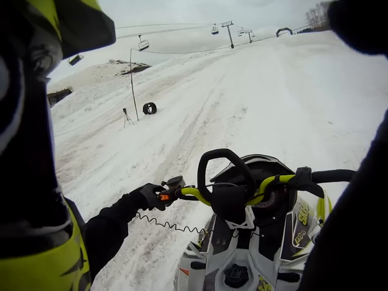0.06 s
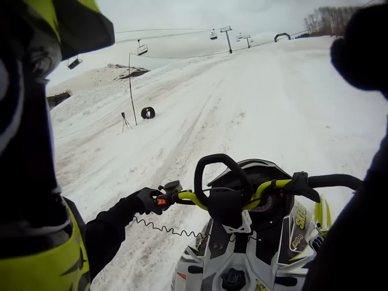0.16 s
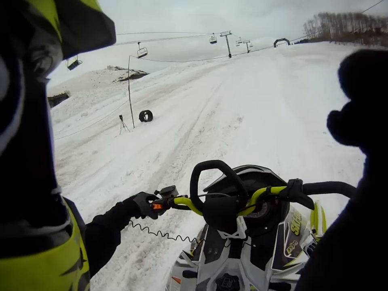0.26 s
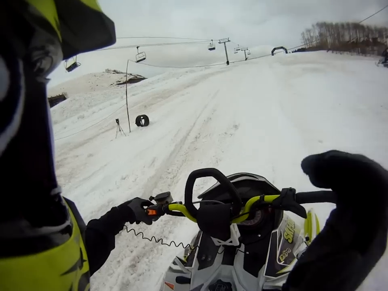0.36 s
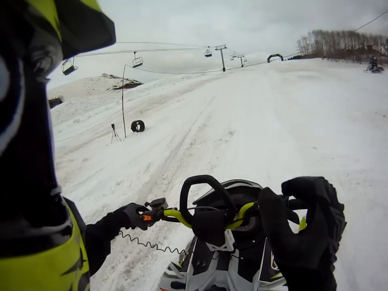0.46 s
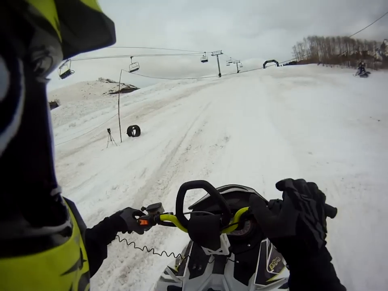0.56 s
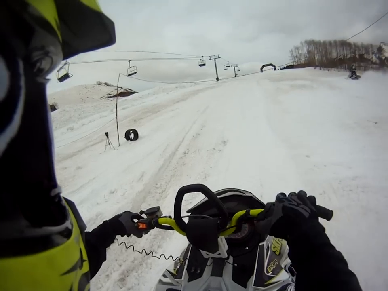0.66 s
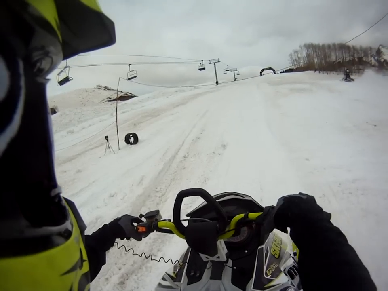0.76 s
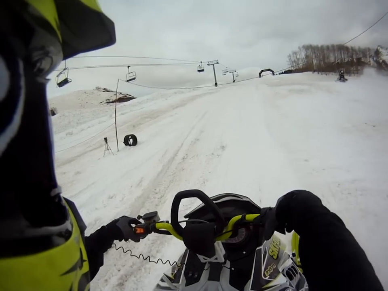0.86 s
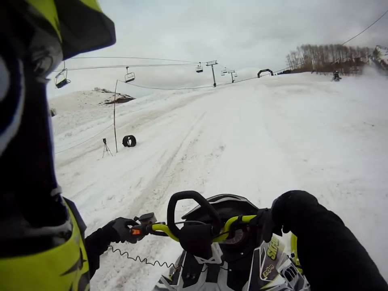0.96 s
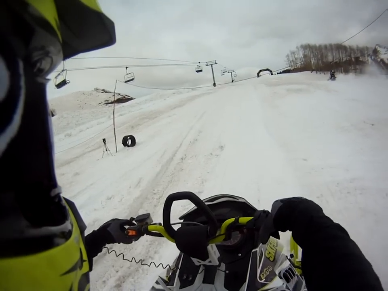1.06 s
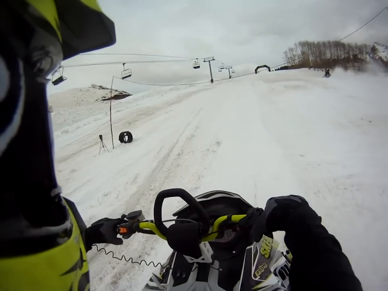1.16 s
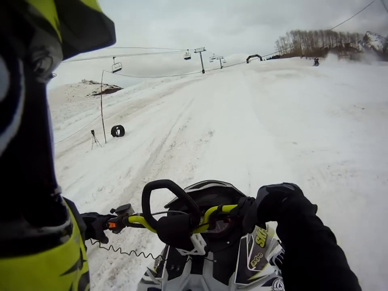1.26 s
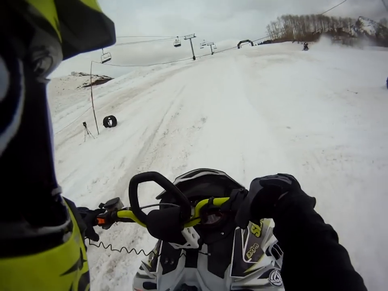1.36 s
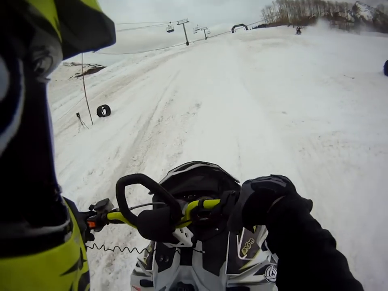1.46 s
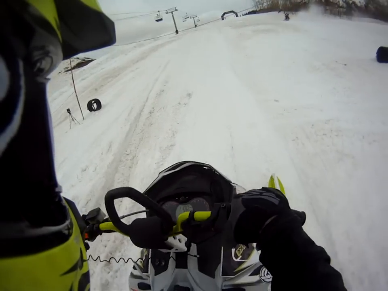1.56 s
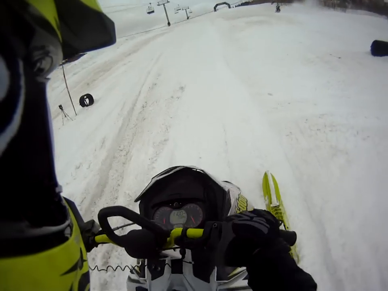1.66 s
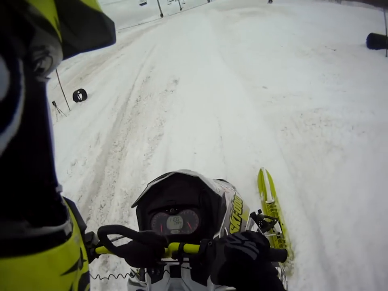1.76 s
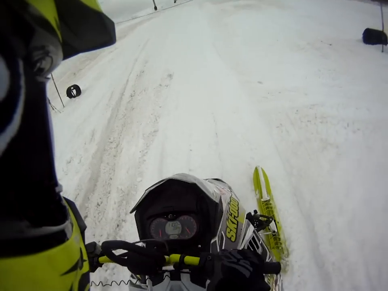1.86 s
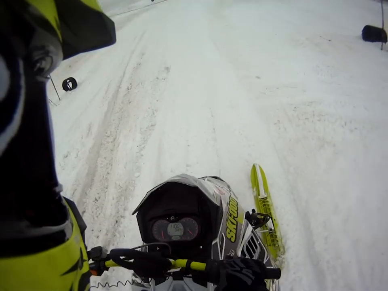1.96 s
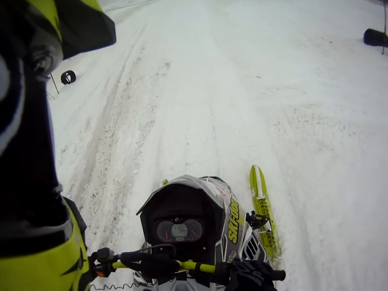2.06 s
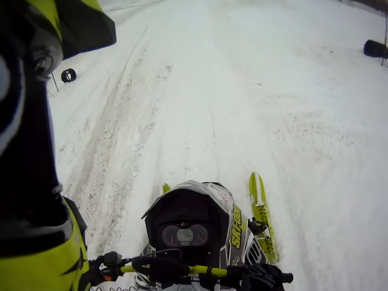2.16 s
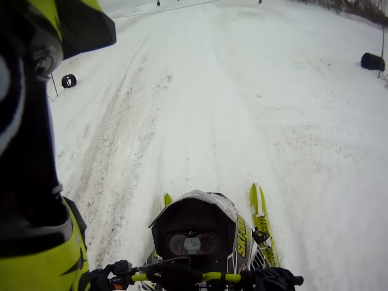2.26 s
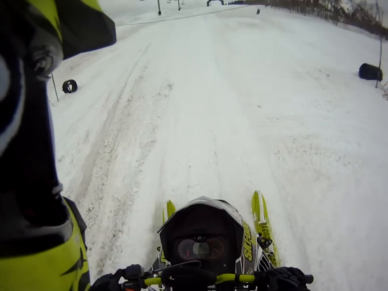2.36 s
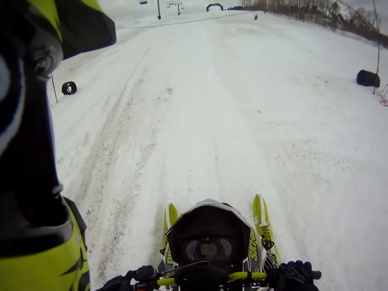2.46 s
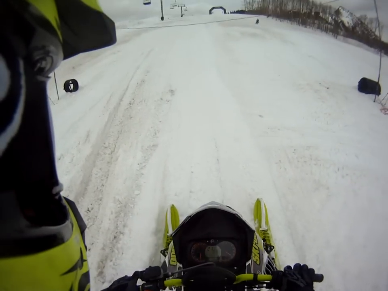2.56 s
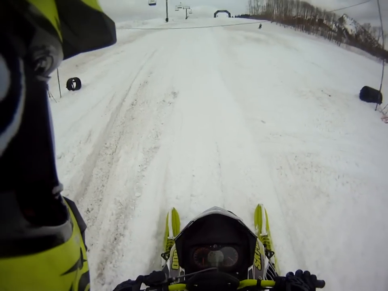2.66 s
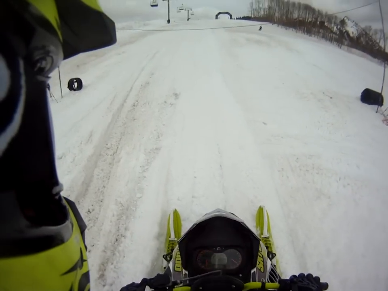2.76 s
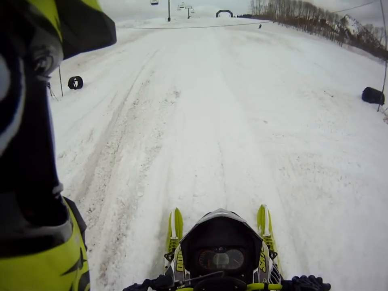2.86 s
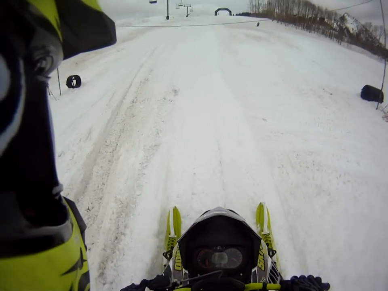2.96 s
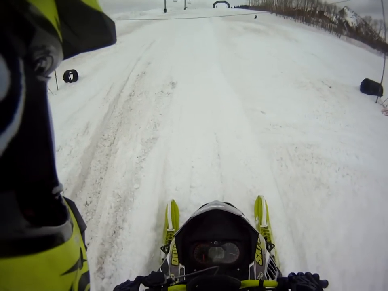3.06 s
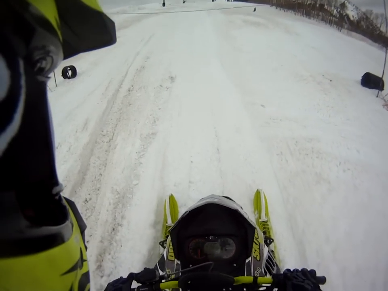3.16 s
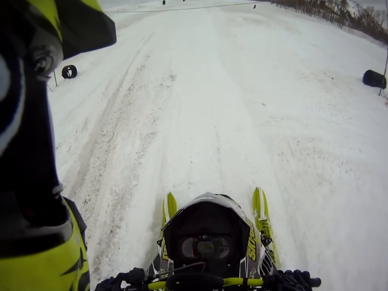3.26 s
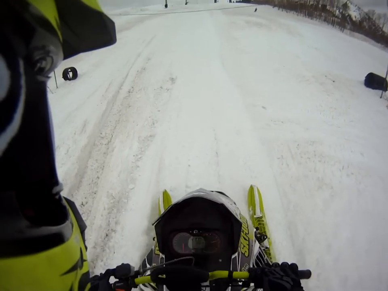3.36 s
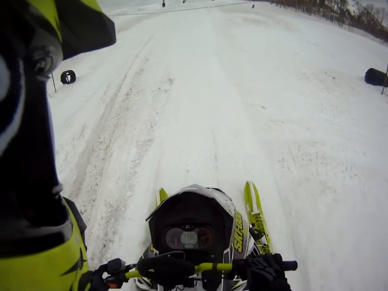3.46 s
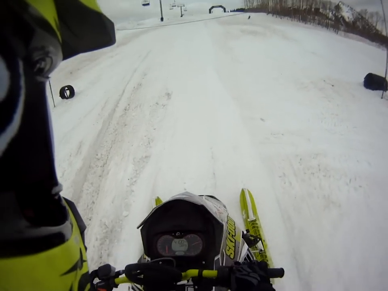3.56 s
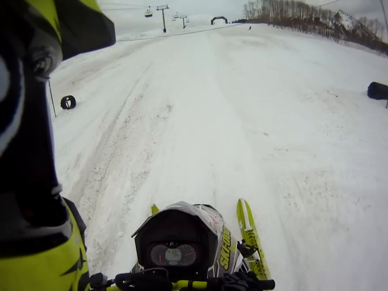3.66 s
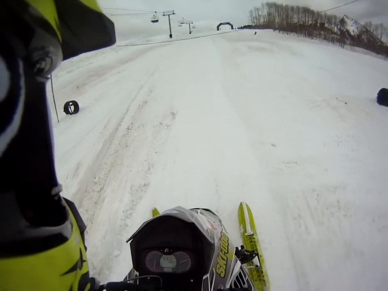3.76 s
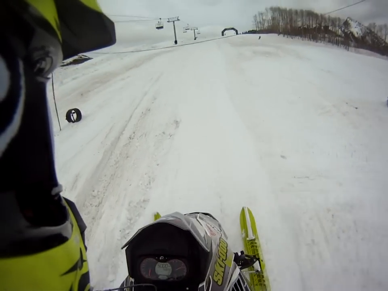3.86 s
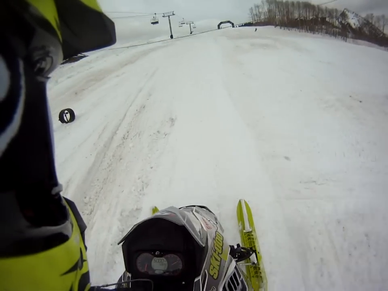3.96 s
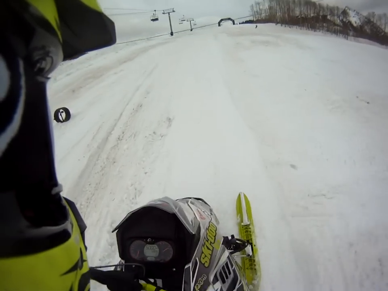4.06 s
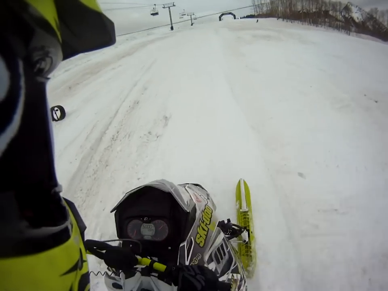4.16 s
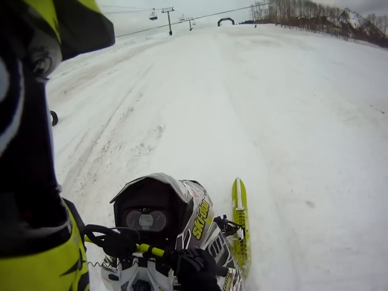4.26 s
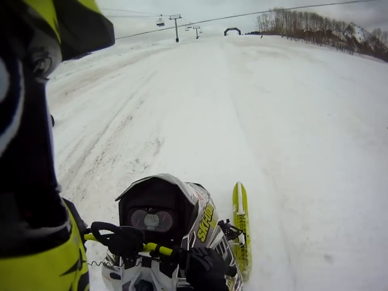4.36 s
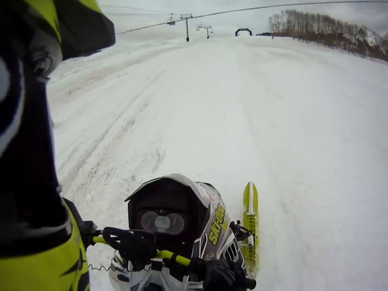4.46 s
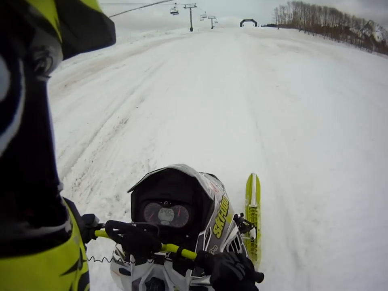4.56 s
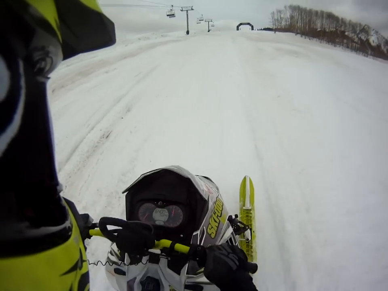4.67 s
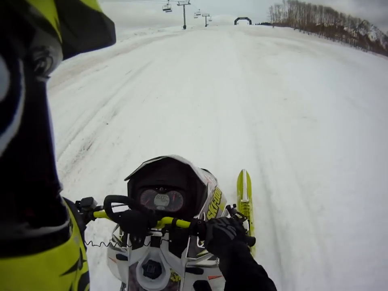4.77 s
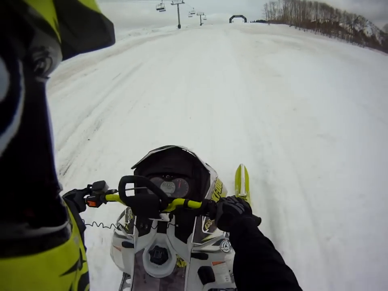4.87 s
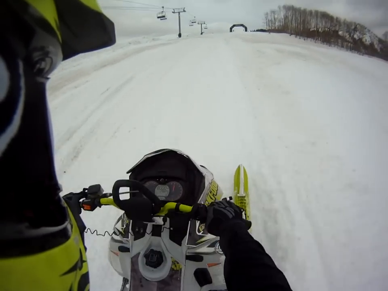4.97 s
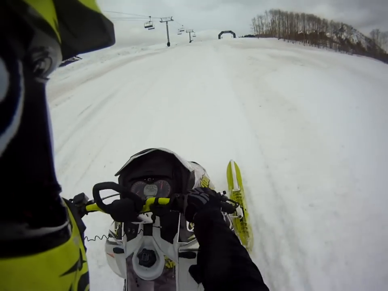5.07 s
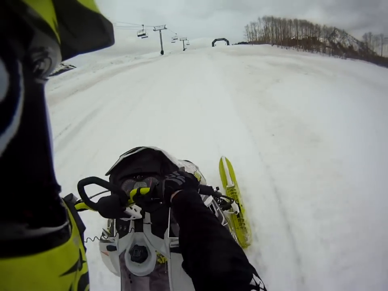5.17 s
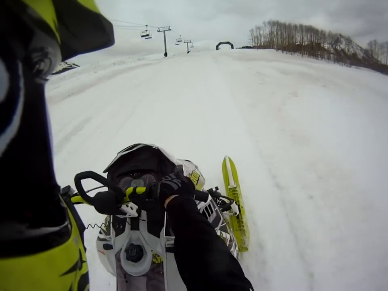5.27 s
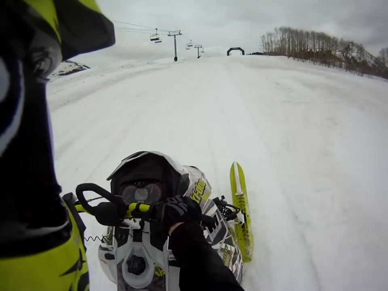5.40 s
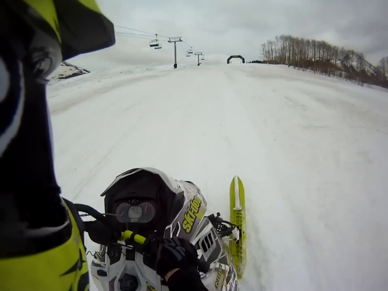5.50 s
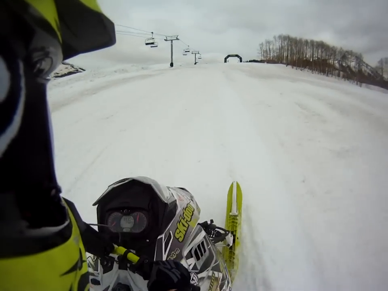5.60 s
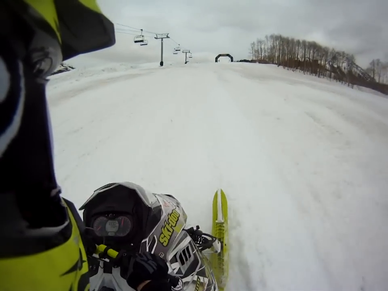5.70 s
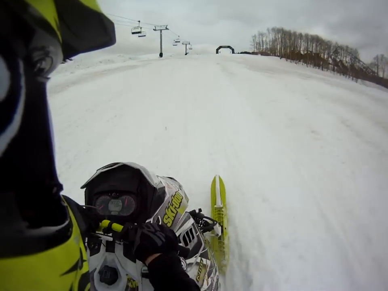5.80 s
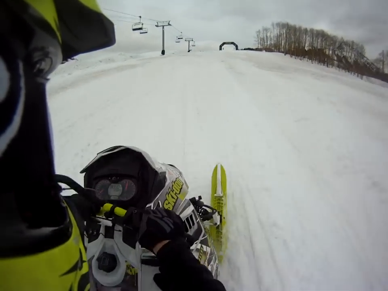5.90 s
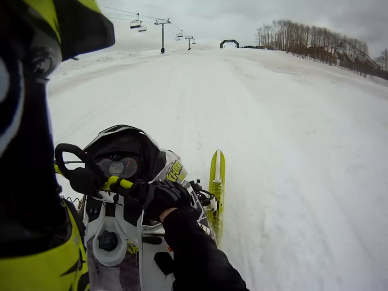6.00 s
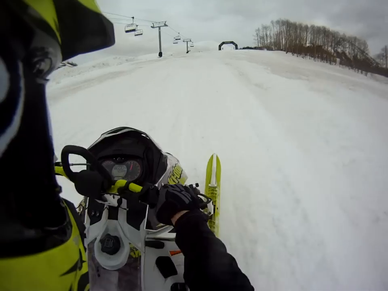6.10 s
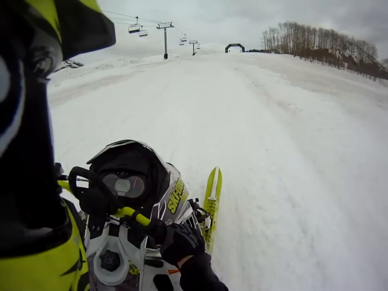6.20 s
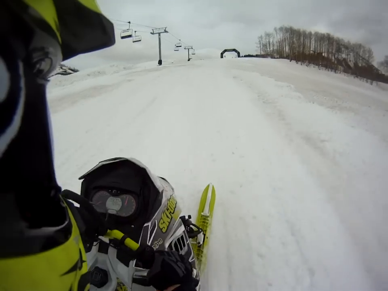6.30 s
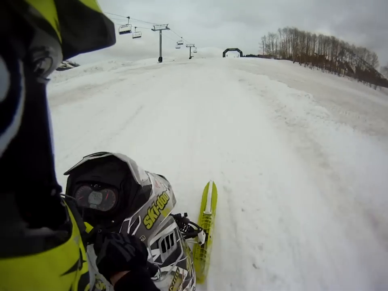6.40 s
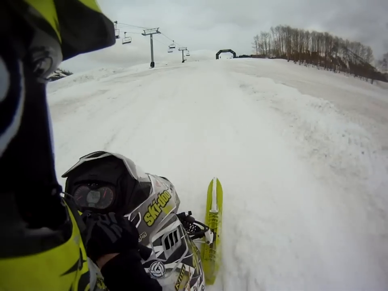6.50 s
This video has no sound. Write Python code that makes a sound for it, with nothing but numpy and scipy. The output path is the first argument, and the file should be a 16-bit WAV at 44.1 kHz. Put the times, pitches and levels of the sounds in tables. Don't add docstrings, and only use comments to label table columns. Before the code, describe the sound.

Outdoors on snow, heard through a sealed camera case on the rider: hard glove knocks and scrapes first, over a quiet lumpy two-stroke idle. A sharp blip and small dabs follow, then a closer engine is pumped several times, each louder, and held at a buzzing, whining full-throttle howl while wind puffs and track hum join. The sound is muffled yet gritty, with metallic low-rate digital edges.

```python
import sys
import numpy as np
from scipy import signal
from scipy.io import wavfile
from scipy.ndimage import uniform_filter1d

SR = 44100
rng = np.random.default_rng(int(sys.argv[2]) if len(sys.argv) > 2 else 0)


def attenuation_scalar(level_db):
    decades = np.asarray(level_db, float) / 20
    return 10 ** decades


def log_audio(samples):
    frames = np.atleast_2d(samples).T
    limited = np.clip(frames, -1, 1)
    pcm = np.round(limited * 32767).astype(np.int16)
    wavfile.write(sys.argv[1], SR, pcm)


N = 288414
T = np.arange(N) / SR


def read(table, fade=0.022):
    s, *columns = np.transpose(table)
    gate = np.clip(np.minimum(T - s[0], s[-1] - T) / fade + 1, 0, 1)
    return [gate] + [np.interp(T, s, column) for column in columns]


def noise():
    return rng.standard_normal(N)


def smooth_twice(x, size):
    return uniform_filter1d(uniform_filter1d(x, size), size)


def even(x, span=0.06):
    return x / np.sqrt(smooth_twice(x ** 2, int(span * SR)) + 1e-18)


def ring(x, hz, width):
    return signal.lfilter(*signal.iirpeak(hz, hz / width, fs=SR), x)


def body(x, modes):
    return sum((-1) ** k * attenuation_scalar(db) * ring(x, hz, width) for k, (hz, width, db) in enumerate(modes))


def walk(rate):
    hold = int(SR / rate)
    steps = np.repeat(rng.standard_normal(N // hold + 1), hold)
    return 2.19 * smooth_twice(steps, hold)[:N]


def colour(points, hz):
    point_hz, point_db = np.transpose(points)
    return np.interp(np.log(hz), np.log(point_hz), point_db)


def orders(turns, first, levels_db, wobble, lag):
    out = 0
    for k, db in enumerate(levels_db):
        level = np.sqrt(2) * attenuation_scalar(db + .8 * walk(20))
        out = out + level * np.cos((first + k) * (2 * np.pi * turns - lag) + wobble * walk(12))
    return out


def hum(table, wobble, overtone_db):
    gate, hz, db = read(table)
    levels_db = [db + overtone_db, db, db - 40, db + overtone_db]
    return gate * orders(np.cumsum(hz) / SR / 2, 0.95, levels_db, wobble=wobble, lag=0)


def throttle(rows, first, cut_db, climb_db_per_hz, slew_s):
    opens, shuts, low_hz, top_hz, db = np.transpose(rows)
    turning_s = np.r_[first[0], np.c_[opens, shuts].ravel()]
    turning_hz = np.r_[first[1], np.c_[low_hz, top_hz].ravel()]
    hz = uniform_filter1d(np.interp(T, turning_s, turning_hz), size=900)
    row = np.minimum(np.searchsorted(shuts, T), len(rows) - 1)
    slew = int(slew_s * SR)
    on = uniform_filter1d(1. * (T >= opens[row]), slew)
    trim = uniform_filter1d((db - climb_db_per_hz * top_hz)[row], slew)
    return hz, on, trim + climb_db_per_hz * hz - cut_db * (1 - on)


def pull(hz, full_rise):
    rise = uniform_filter1d(np.gradient(hz), size=1200) * SR / full_rise
    return np.clip(np.maximum(rise, np.roll(rise, shift=1100)), 0, 1)


def firings(turns, scatter_db, late_s, uneven_db):
    at = np.flatnonzero(np.diff(np.floor(turns)) > 0)
    strength, lateness = rng.standard_normal((N // 100, 2))[:len(at)].T
    size = attenuation_scalar(scatter_db * strength - uneven_db * (np.arange(len(at)) % 2))
    pulses = np.zeros(N)
    np.add.at(pulses, np.clip(at + (late_s * SR * lateness).astype(int), 0, N - 1), size)
    return pulses


def rasp(turns, pulses, modes, puff, gas_db, low_db):
    gas = np.exp(-(turns % 1) / puff) * noise() * attenuation_scalar(2 * walk(25))
    drive = even(pulses) + attenuation_scalar(gas_db) * even(gas)
    return attenuation_scalar(low_db) * even(body(drive, modes[:3])) + even(body(drive, modes[3:]))


# (time [s], peak level [dB], half length [s])
GUSTS = [
    (1.47, -51, .1),
    (2.02, -35.5, 0.048),
    (2.47, -52, 0.22),
    (2.803, -44, 0.15),
    (3.412, -48, 0.07),
    (4.27, -37, 0.055),
    (5.084, -35, 0.061),
    (5.586, -40, 0.061),
    (5.98, -35, 0.055),
    (6.459, -31, 0.096),
]


def wind():
    still_db, moving_db, moves_s = -48.5, -34.5, 3.42
    steady = attenuation_scalar(np.interp(T, [moves_s - .1, moves_s], [still_db, moving_db]))
    puffs = sum(attenuation_scalar(db) * np.exp(-((T - s) / half) ** 2) for s, db, half in GUSTS)
    gust = (steady + puffs) * attenuation_scalar(0.65 * walk(9))
    rumble = even(ring(ring(noise(), 25.0, 52), 35, 105), span=0.22)
    buffet = even(ring(noise(), 240, 280), span=.3)
    return gust * attenuation_scalar(-9.5) * (rumble + buffet)


# (time [s], frequency [Hz], level [dB])
SHAKE = [
    (0.5, 37.5, -49),
    (1.52, 37.1, -65),
    (1.74, 39.7, -56),
    (2.65, 39.7, -50),
    (3.16, 39, -59),
    (3.28, 39.2, -41),
    (3.5, 38.4, -57),
]


def seat_shake():
    return hum(SHAKE, wobble=0.56, overtone_db=-21)


# (time [s], frequency [Hz], level [dB])
TRACK = [
    (4.45, 144, -49.5),
    (4.8, 182.3, -43.5),
    (5.35, 199.7, -51),
    (5.8, 230.5, -40.5),
    (6.54, 250.1, -47),
]


def track():
    return hum(TRACK, wobble=0.39, overtone_db=-4)


# (frequency [Hz], width [Hz], level [dB])
CASE_MODES = [(547, 61, -6.5), (825, 40, -3.5), (1181, 44.5, 7), (1505, 115, -0.5), (1882, 161, 4.5),
              (2162, 90, 4.5), (3542, 440, -8.5), (4290, 830, -17), (5450, 220, -9.5)]
# (time [s], rustle level [dB], low shove level [dB])
GLOVE = [
    (0.0, -47, -59),
    (0.096, -44, -43.5),
    (0.188, -37, -27.5),
    (0.212, -40, -7.5),
    (0.232, -69, -48),
    (0.288, -43, -33),
    (0.328, -57, -46),
    (0.345, -38, -43),
    (0.9, -45.5, -79),
]
# (time [s], centre [Hz], level [dB])
SLEEVE = [
    (0, 2310, -37),
    (.17, 2220, -33),
    (.2, 2270, -72),
    (.35, 3500, -52),
    (.87, 3500, -56),
    (1.0, 4015, -49),
    (1.15, 4170, -66),
    (1.3, 4480, -53),
    (1.6, 4540, -60.5),
]
# (time [s], length [s], level [dB], thump level [dB], thump frequency [Hz])
BUMPS = [
    (0.194, 0.0042, -16, -5, 120),
    (0.201, 0.0023, -18, -7, 110),
    (0.2098, 0.0052, -4, -7.5, 310),
    (0.239, 0.0083, -43, -14, 100),
    (2.112, 0.0087, -32, -23, 196.6),
    (2.123, 0.0069, -35.5, -23, 407),
    (2.204, 0.0044, -39, -30, 505),
    (2.673, 0.0051, -39, -30, 301.7),
]
# (time [s], length [s], level [dB])
SCRAPES = [
    (0.252, 0.053, -30),
    (0.276, .019, -23.5),
    (0.311, 0.024, -30),
]


def glove():
    gate, rustle_db, shove_db = read(GLOVE, fade=0.8)
    grain = noise() * attenuation_scalar(0.39 * walk(210))
    dull = even(body(grain, CASE_MODES[1:6]))
    bright = even(ring(grain, 3460, 670) + 0.12 * ring(grain, 4570, 290))
    latch = even(ring(grain, 5000, 300))
    rustle = attenuation_scalar(rustle_db - 8.0) * (dull + 0.92 * bright)
    shove = attenuation_scalar(shove_db) * even(ring(noise(), 51, 52))
    sleeve_gate, sleeve_hz, sleeve_db = read(SLEEVE)
    hiss = even(smooth_twice(noise(), 60))
    carrier = np.cos(2 * np.pi * np.cumsum(sleeve_hz) / SR)
    out = gate * (rustle + shove) + sleeve_gate * attenuation_scalar(sleeve_db - 4.5) * hiss * carrier

    knocks = [(s, length, db, 1.53 * db + 8.5, *thump) for s, length, db, *thump in BUMPS]
    scrapes = [(s, length, db, -18, db - 7, 600) for s, length, db in SCRAPES]
    thump_t = np.arange(int(.05 * SR)) / SR
    for s, length, db, bright_db, thump_db, thump_hz in knocks + scrapes:
        i, n = int(s * SR), int(length * SR)
        contact = (dull + attenuation_scalar(bright_db) * bright + attenuation_scalar(-22.5) * latch)[i:i + n]
        out[i:i + n] += attenuation_scalar(db) * np.hanning(n) ** 0.22 * contact
        thump = np.exp(-thump_t / 0.0028) * np.sin(2 * np.pi * thump_hz * thump_t)
        out[i:i + len(thump_t)] += attenuation_scalar(thump_db) * thump

    mount_hz, peak_s, peak_db, fall_db_per_s = 70.2, .38, -27, 45
    mount = [(0.257, mount_hz, peak_db - 5), (peak_s, mount_hz, peak_db),
             (peak_s + 1, mount_hz, peak_db - fall_db_per_s)]
    return out + hum(mount, wobble=.05, overtone_db=-37)


# (frequency [Hz], width [Hz], level [dB])
COWL = [(513, 130, -8.5), (801, 13, -11.5), (1160, 83, -3.5), (1446, 17, 1.5), (1782, 57, -1),
        (2040, 61, -5.5), (3500, 78, -14), (3850, 63, -16.5), (4400, 480, -27.5), (5330, 160, -17)]
# (frequency [Hz], level [dB])
BOOM = [(75, -74), (110, -42), (152, -41), (178, -45), (250, -51.5), (280, -45), (335, -57.5), (380, -50)]
# (opens [s], shuts [s], crank rate at opening [Hz], at shutting [Hz], rasp at shutting [dB])
BLIPS = [
    (1.71, 1.745, 44, 47.55, -42),
    (1.75, 2.015, 47.98, 94.04, -35),
    (2.1, 2.17, 86.4, 88.2, -42),
    (2.43, 2.61, 76.6, 86.1, -39.5),
    (2.72, 2.87, 80.35, 86.7, -40.5),
    (2.93, 3.0, 84.1, 89.4, -43),
]


def blipped():
    idle_until_s, idle_hz = 1.58, 37.3
    hz, _, rasp_db = throttle(BLIPS, (idle_until_s, idle_hz), cut_db=4.5, climb_db_per_hz=0.18, slew_s=.035)
    gate = np.clip(1 + (BLIPS[-1][1] - T) / .06, 0, 1)
    load = pull(hz, full_rise=110)
    turns = np.cumsum(hz) / SR

    boom_db = [colour(BOOM, k * hz) + 0.58 * (rasp_db + 46.5) + lift_db * load
               for k, lift_db in zip(range(2, 5), (-2.5, 3, 1.5))]
    boom = orders(turns, 2, boom_db, wobble=0.089, lag=0.68)
    boom = boom + orders(turns, 0.97, [boom_db[0] - 15.0], wobble=.3, lag=0.53)
    boom = boom + orders(turns, 4.5, [boom_db[2] - 17.0], wobble=.2, lag=0.42)

    steady = firings(turns, scatter_db=1.2, late_s=.00003, uneven_db=0)
    overtone_modes = [(250, 63, 3.0), (408, 43, -5.5), (535, 36, 4.5), (598, 66, -2.0)]
    overtones = even(ring(body(steady, overtone_modes), 354, 400))
    overtones_db = rasp_db + 1.4 - .5 * np.maximum(48 - hz, 0)

    pulses = firings(2 * turns, scatter_db=3, late_s=.00006, uneven_db=6)
    puff = np.clip((hz - 25) / 40, .3, 1)
    rough = rasp(turns, pulses, COWL, puff=puff, gas_db=0, low_db=-.3 * (rasp_db + 43))

    burst = even(steady) + .9 * even(np.exp(-(turns % 1) / .2) * noise())
    crack_modes = [(1530.0, 51, 2.0), (1833, 93, 1.5), (2036, 84, -6)]
    crack = load * (hz / 85) ** 0.84 * even(ring(body(burst, crack_modes), 2300, 790))
    crack = crack + 0.83 * load * even(ring(steady, 428, 41))
    stumble = (1 - load) * orders(turns, 1.7, [boom_db[0] - 7.5], wobble=1.3, lag=0)
    top = (1 - .5 * load) * rough + 1.3 * crack
    return gate * (boom + stumble + attenuation_scalar(overtones_db) * overtones + attenuation_scalar(rasp_db - 3.0) * top)


# (opens [s], shuts [s], firing rate at opening [Hz], at shutting [Hz], rasp at shutting [dB])
PUMPS = [
    (2.96, 3.21, 86.8, 160.4, -27.5),
    (3.28, 3.445, 149.3, 179.2, -26),
    (3.51, 3.67, 165.7, 183.9, -27),
    (3.77, 3.975, 162.7, 199.3, -23),
    (4.045, 4.36, 178.5, 254.3, -14),
]
# (frequency [Hz], level [dB])
PIPE = [(90, -40), (150, -30), (330, -43.5), (480, -34), (600, -32), (670, -30), (770, -29), (830, -8.5)]
CUT_DB = (11, 33, 4.4, 8)
# (time [s], firing rate [Hz], rider's lean, head turn, crouch [all relative])
WIDE = [(4.36, 255, -2, -2, 0.4), (4.46, 267.9, -0.8, 1.3, 1.3), (4.62, 269.8, 1.2, 1.7, 0),
        (4.73, 273.5, 2.33, 1.7, 2.1), (4.88, 269.2, 0.96, 0.1, -0.2), (4.99, 266.7, -0.5, 0.1, -0.2),
        (5.08, 265.2, -1, 1.2, -0.2), (5.2, 262.4, -0.05, 2.3, -0.1), (5.32, 262.9, 0.1, -0.5, -1.5),
        (5.45, 266.6, 0, -2.5, 1.1), (5.7, 268.9, 1, -0.2, 0.4), (5.82, 265.8, 1.32, 1.3, -0.1),
        (5.95, 261.7, -0.43, 1.0, -0.7), (6.04, 256.9, 0.1, 0.5, -1.2), (6.18, 265.4, 0.5, -1.5, 1.3),
        (6.31, 270.8, 2.13, 1.7, 1), (6.4, 265.5, -0.5, 0, 0.5), (6.54, 261.6, -1, -0.1, -2)]
# (level [dB], change per lean [dB], per head turn [dB], per crouch [dB])
SHADE = [(-22.5, -1.74, 1.33, -0.07), (-27, -3.5, 0.5, 2), (-22.5, 5.5, -4, -0.9), (-18.5, 4, -0.1, -2.8),
         (-31.5, -1, 2.1, -3.2), (-25.5, 3, -3.26, -6), (-21, -2, 0.5, -1), (-25.5, -0.5, 0.8, -3.3)]


def near():
    hz, on, rasp_db = throttle(PUMPS, (0, 84), cut_db=7, climb_db_per_hz=0.17, slew_s=0.035)
    wide, wide_hz, lean, head_turn, crouch = read(WIDE, fade=0.027)
    wide_rasp_db = -16.5 - 0.84 * lean + 0.48 * head_turn + 0.27 * walk(5.3)
    hz = hz + wide * (wide_hz - hz)
    rasp_db = rasp_db + wide * (wide_rasp_db - rasp_db)
    turns = np.cumsum(hz) / SR
    gate = np.clip((T - PUMPS[0][0]) / 0.06 + 1, 0, 1)
    open_from_hz, open_full_hz = 216, 255
    open_gate = np.clip((hz - open_from_hz) / (open_full_hz - open_from_hz), 0, 1)
    part_gate = 1 - open_gate

    full_db = [db + a * lean + b * head_turn + c * crouch + .6 * max(k - 3, 0) * walk(8)
               for k, (db, a, b, c) in enumerate(SHADE)]
    thin_db = 0.19 * np.maximum(155 - hz, 0)
    burning = np.maximum(on, np.roll(on, shift=1000))
    part_db = []
    for k, (cut, weak) in enumerate(zip(CUT_DB, (2, -3, 2.5, 31.5))):
        formed_db = colour(PIPE, (k + 1) * hz) - cut * (1 - burning) - (k > 0) * thin_db
        part_db.append(formed_db + 0.54 * (rasp_db + 30) - weak)
    exhaust_db = [part_gate * part + open_gate * full for part, full in zip(part_db, full_db)]
    note = gate * orders(turns, 1, exhaust_db, wobble=.25, lag=.1)

    howl_db = [db + 5 * pull(hz, full_rise=260) - 14 * part_gate for db in full_db[4:]]
    howl = open_gate * orders(turns, 5, howl_db, wobble=.3, lag=.3)

    lope_db = [exhaust_db[0] - drop_db for drop_db in (25, 23, 21)]
    lope = gate * orders(turns, .5, lope_db, wobble=0.63, lag=0.11)
    line_db = [rasp_db - 2 * thin_db - drop_db for drop_db in (17.3, 90, 28, 34, 19, 13.7)]
    lope = lope + gate * part_gate * on * orders(turns / 2, 7, line_db, wobble=0.29, lag=0.23)

    settled = np.clip((T - 5.0) / 0.52, 0, 1)
    whine_db = [top_db - 0.5 - 6 * settled + 2.2 * walk(3)
                for top_db in (-16, -20.5, -21.5, -24.5, -19, -27, -28)]
    whine = open_gate * orders(turns, 9, whine_db, wobble=.6, lag=.3)

    steady = firings(turns, scatter_db=1.5, late_s=.00001, uneven_db=1.5)
    bark_modes = [(578, 66, 5), (860, 329, -27), (1129, 38, 10.5), (1858, 62, 9.0)]
    bark = even(ring(body(steady, bark_modes), 2250, 2400))

    low_db = -6 + 6 * (1 - on) + 8 * np.exp(-((hz - 172) / 16) ** 2)
    pulses = firings(turns, scatter_db=4, late_s=.00006, uneven_db=2.5)
    rough = rasp(turns, pulses, CASE_MODES, puff=1.0, gas_db=13.5, low_db=low_db)
    load = part_gate * pull(hz, full_rise=150)
    rough = (1 - .22 * load - .24 * open_gate) * rough
    sharp = (hz / 268) ** 8 * whine + (.3 * part_gate + .62 * load) * bark
    airbox = even(ring(ring(steady, 587, 190), 610, 190))
    sharp = sharp + .5 * load * np.clip(thin_db / 4, 0, 1) * airbox
    return note + howl + lope + gate * attenuation_scalar(rasp_db - 1.5) * (rough + sharp)


def scene():
    sled = near() + track() + seat_shake()
    rounded = .9 * np.tanh(sled / .9)
    return (wind() + glove() + blipped() + rounded)[None]


def low_pass(x):
    return signal.sosfilt(signal.butter(12, 15610, fs=SR, output="sos"), x)


def record(dry):
    muffled = signal.sosfilt(signal.butter(8, 5570, fs=SR, output="sos"), dry)
    slow = np.clip(signal.resample_poly(muffled, 40, 147, axis=1), -.95, .95)
    held = signal.resample_poly(np.repeat(slow, 4, axis=1), 147, 160, axis=1)[:, :N]
    held = signal.sosfilt(signal.ellip(6, .2, 19, 15250, fs=SR, output="sos"), held)
    return low_pass(held)


dry = scene()
out = record(dry)
log_audio(out)
```